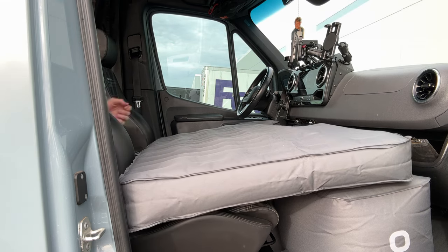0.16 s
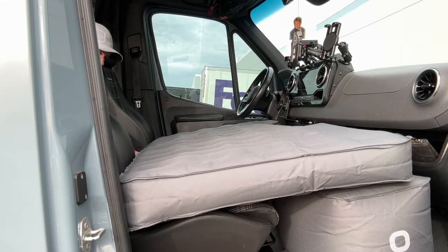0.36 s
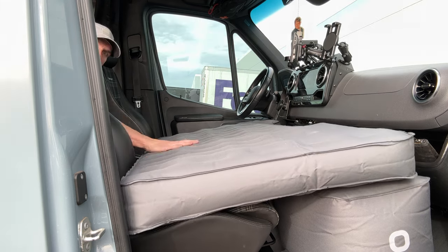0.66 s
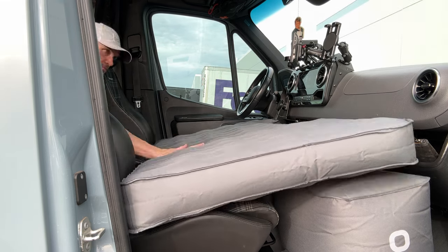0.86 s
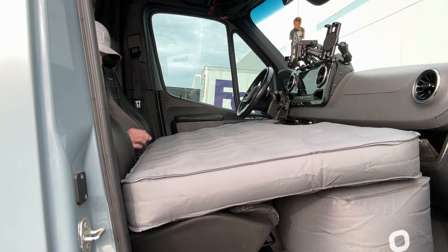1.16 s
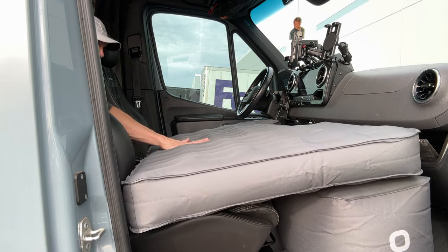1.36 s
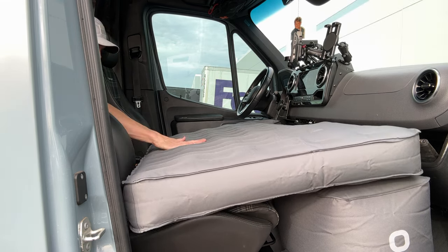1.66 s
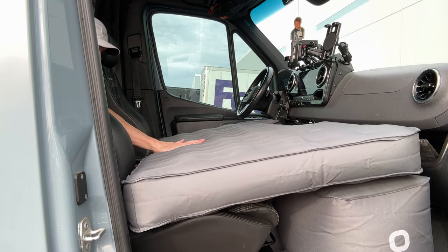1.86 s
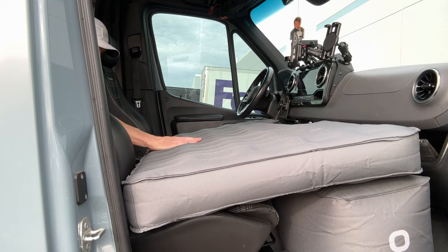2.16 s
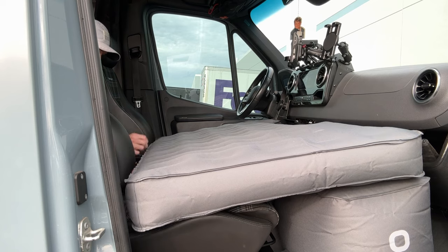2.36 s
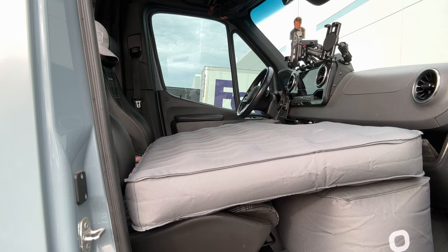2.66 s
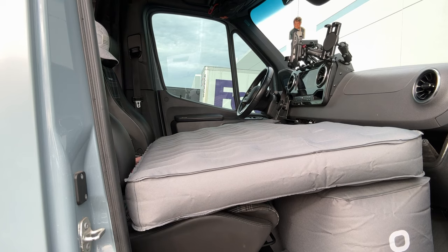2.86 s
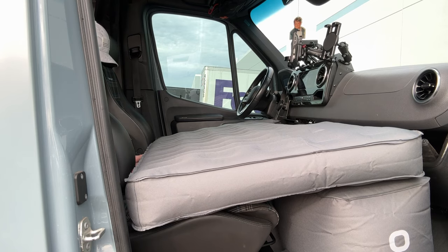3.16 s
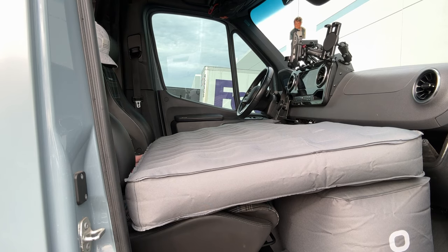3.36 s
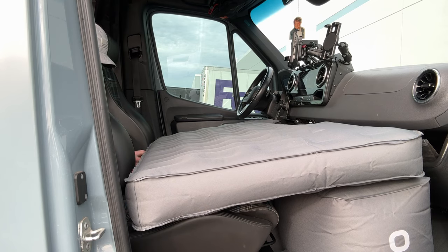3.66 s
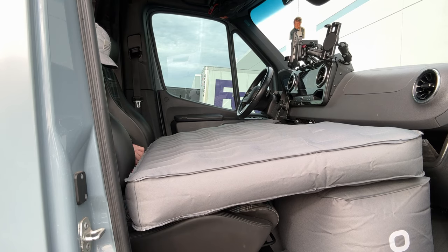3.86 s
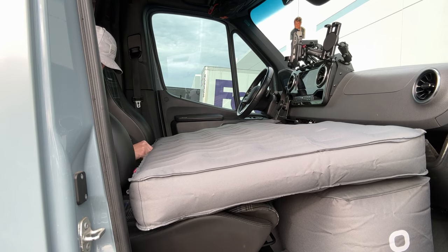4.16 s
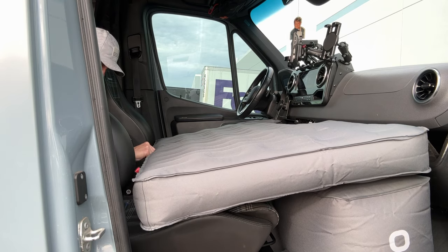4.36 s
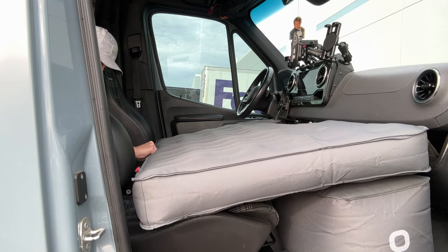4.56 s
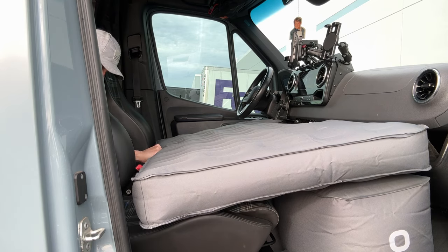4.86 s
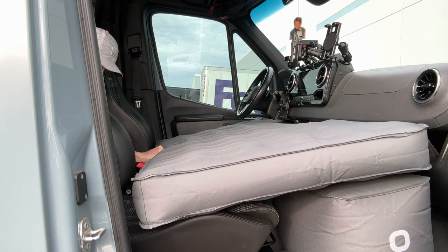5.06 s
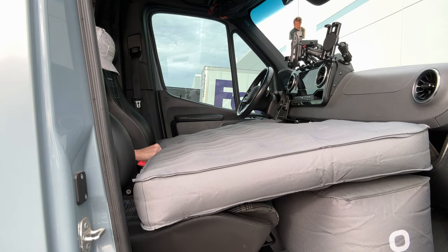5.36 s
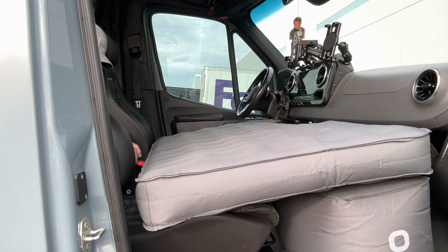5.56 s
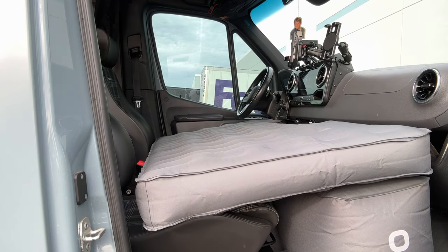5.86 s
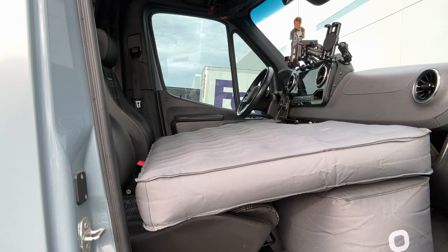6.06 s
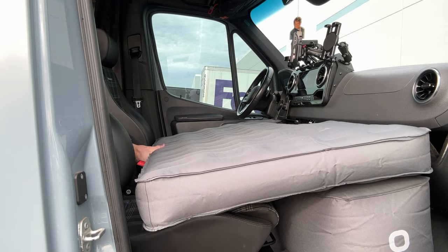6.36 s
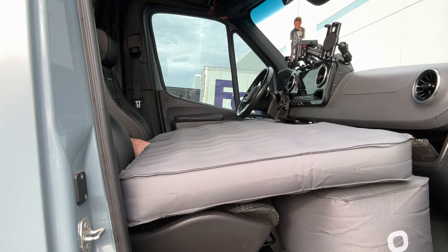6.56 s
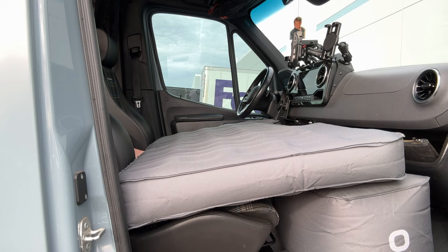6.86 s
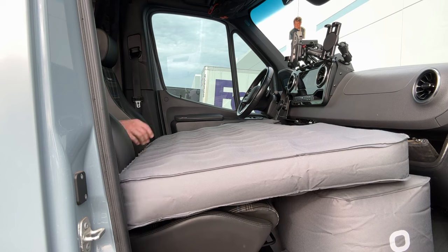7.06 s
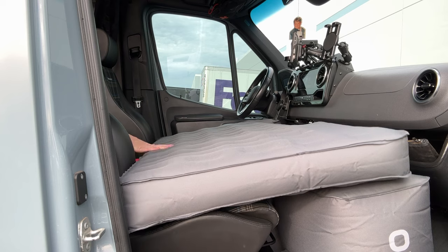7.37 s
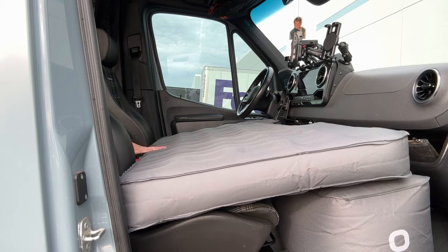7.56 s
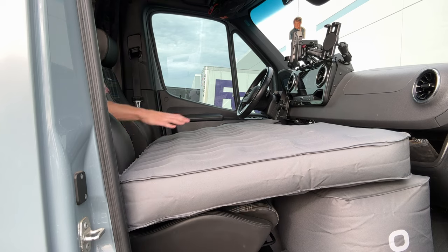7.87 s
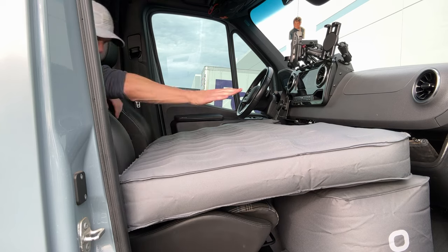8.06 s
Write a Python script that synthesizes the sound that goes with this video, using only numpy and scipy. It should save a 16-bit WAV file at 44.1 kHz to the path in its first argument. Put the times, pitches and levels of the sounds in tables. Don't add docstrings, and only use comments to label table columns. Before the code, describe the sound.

In a van cab, a small electric blower fills an air mattress. Thin hiss, faint wavering leak whistles and high whine come first, then an abrupt change to a much louder, fuller roar. The nozzle slips with a sharp air burst and thump, and the whine sags slightly. After switch-off the rotor glides down in pitch while a hand pats and rubs the vinyl. One close microphone, right channel only, left silent.

```python
import sys
import numpy as np
from scipy import signal
from scipy.fft import rfft, irfft, next_fast_len
from scipy.io import wavfile
from scipy.ndimage import uniform_filter1d

SR = 44100
rng = np.random.default_rng(int(sys.argv[2]) if len(sys.argv) > 2 else 0)


def gain_from_db(level_db):
    decades = np.asarray(level_db, float) / 20
    return 10 ** decades


def transcribe(u):
    v = np.clip(np.atleast_2d(u).T, -1, 1)
    q = np.round(v * 32767).astype(np.int16)
    wavfile.write(sys.argv[1], SR, q)


N = 362502
SLOW = 32
MOVE_S, SLIP_S, SWITCH_OFF_S = 1.625, 3.42, 5.75


def rms_one(x):
    return x / np.sqrt(np.mean(x ** 2) + 1e-20)


def at_hz(points, hz):
    point_hz, point_db = np.transpose(points)
    return np.interp(np.log(hz), np.log(point_hz), point_db)


def drift(rate_hz):
    r = np.exp(-2 * np.pi * rate_hz * SLOW / SR)
    noise = rng.standard_normal(N // SLOW + 3001)
    return rms_one(signal.lfilter([1], [1, -2 * r, r * r], noise)[3000:])


def full_rate(slow):
    return np.interp(np.arange(N) / SLOW, np.arange(len(slow)), slow)


def ring(clicks, hz, t60):
    r, w = gain_from_db(-60 / (t60 * SR)), 2 * np.pi * hz / SR
    return signal.lfilter([0, np.sin(w)], [1, -2 * r * np.cos(w), r * r], clicks + 1e-18)


def band_noise(order, low_hz, high_hz, n):
    band = signal.butter(order, [low_hz, high_hz], "band", fs=SR, output="sos")
    return signal.sosfilt(band, rng.standard_normal(n))


def bell(t, s, half):
    return np.exp(-((t - s) / half) ** 2)


def by_side(t, nozzle_db, pump_db, slipped_db):
    slip = np.clip((t - SLIP_S) / 0.18, 0, 1)
    return np.where(t < MOVE_S, nozzle_db, pump_db + (slipped_db - pump_db) * slip)


def rotor(t):
    # time in seconds, blade pass rate in Hz
    speed = [(0, 2676), (.5, 2675), (1.02, 2664), (1.53, 2648), (2.04, 2642), (2.55, 2637), (3.42, 2635),
             (3.5, 2615), (3.63, 2578), (3.8, 2543), (4.0, 2526), (4.59, 2518), (5.1, 2512), (5.6, 2528),
             (5.761, 2525)]
    drag_equals_friction_hz, coast_rate_per_s = 1080.3, .29484
    off_s, off_hz = speed[-1]
    angle = np.arctan(off_hz / drag_equals_friction_hz) - coast_rate_per_s * np.maximum(t - off_s, 0)
    free_hz = drag_equals_friction_hz * np.tan(angle)
    blade_hz = np.where(t < off_s, np.interp(t, *np.transpose(speed)), free_hz)
    return blade_hz, 20 * np.log10(free_hz / off_hz)


def blade_levels():
    # level in dB from the nozzle side, from the pump side,
    # after the nozzle slips, change in dB when coasting
    blades = [(-67.5, -51, -43.5, -3), (-63, -62.5, -55, 2.5), (-67, -55, -52, -2.5),
              (-62.5, -58.5, -59.5, 1), (-80, -58.5, -58, -5), (-99.5, -90, -73, 6)]
    # time in seconds, half length in seconds, change in dB
    hand_turns = [
        [(.4, 0.076, 7.5), (.8, 0.28, -2), (3.412, 0.01, -12)],
        [(1.86, 0.1, -5.5), (2.5, 0.046, -7), (3.15, 0.29, 8.5), (4.88, 0.12, -16), (5.14, 0.15, 2),
         (5.5, 0.28, -5)],
        [(2.0, 0.3, 9), (3.65, 0.22, 8.5), (4.8, 0.093, -8), (5.6, 0.11, 6.5)],
        [(2.98, 0.2, -16), (3.6, .08, 10.5), (3.91, 0.16, -12), (4.87, 0.11, -2), (5.5, 0.094, -20)],
        [(1.45, .2, 6), (1.9, 0.15, -12), (2.55, 0.27, 5.5), (3.62, 0.16, 4), (4.12, 0.087, -1),
         (4.58, 0.091, 5), (5.3, 0.12, -13), (5.54, 0.078, 6.5)],
        [(3.8, .12, -3), (4.98, 0.14, 10), (5.38, .07, 5)],
        [],
    ]
    # frequency in Hz, gain in dB
    housing = [(700, 14.5), (1000, 5), (1700, -10), (2620, -5), (2900, 2.5), (4300, 6), (5900, -3),
               (16000, 12)]
    echo_share, echo_comb_hz = 0.42, 433
    t = np.arange(0, N, SLOW) / SR
    blade_hz, slower_db = rotor(t)
    coast = np.clip((t - SWITCH_OFF_S) / 0.15, 0, 1)
    levels = []
    for k, (nozzle_db, pump_db, slipped_db, coast_db) in enumerate(blades):
        line_hz = (k + 1) * blade_hz
        turned_db = sum(db * bell(t, s, half) for s, half, db in hand_turns[0] + hand_turns[k + 1])
        echo_db = 20 * np.log10(abs(1 - echo_share * np.exp(2j * np.pi * line_hz / echo_comb_hz)))
        speed_db = (2.72 + 0.46 * k) * slower_db
        free_db = speed_db + coast * (coast_db + at_hz(housing, line_hz) + echo_db)
        levels.append(full_rate(by_side(t, nozzle_db, pump_db, slipped_db) + turned_db + free_db))
    return full_rate(blade_hz), levels


def impeller(flutter_db, coast_flutter_db, wobble):
    blade_hz, levels_db = blade_levels()
    turns = np.cumsum(blade_hz * (1 + wobble * full_rate(drift(25)))) / SR / 8
    whine, t = np.zeros(N), np.arange(N) / SR
    depth_db = np.where(t < SWITCH_OFF_S, flutter_db, coast_flutter_db)
    for k, level_db in enumerate(levels_db):
        flutter = depth_db * full_rate(0.22 * drift(11.6) + 0.73 * drift(40))
        tone = np.sin(2 * np.pi * 8 * (k + 1) * turns + k)
        whine += gain_from_db(level_db + 3.0 + flutter) * tone
    whine *= np.clip((8.0 - t) / 0.036, 0, 1)
    return whine + shaft(turns, blade_hz), turns


def shaft(turns, blade_hz):
    # multiple of the shaft rate, level in dB before and in dB after the nozzle slips
    orders = [(1, -60.5, -56), (2, -55, -64.5), (3, -68, -54), (4, -56, -52), (5, -65, -57), (9, -56, -85),
              (12, -63.5, -82), (13, -61, -55), (14, -56, -66), (18, -59.5, -68)]
    out, t = np.zeros(N), np.arange(N) / SR
    for order, early_db, late_db in orders:
        level_db = np.where(t < SLIP_S, early_db, late_db)
        out += gain_from_db(level_db + 2.28 * full_rate(drift(4.2))) * np.sin(2 * np.pi * round(order) * turns)
    return out * (t > MOVE_S) * (blade_hz / 2550) ** 4.3


def zone_levels(t):
    # level in dB from the nozzle side, pump side, slipped,
    # share of the flow's swing, power of speed when coasting
    zones = [
        (-89.5, -67.5, -68.5, .1, 0.061),
        (-68.5, -44, -45, 0.16, 1.61),
        (-53.5, -44.5, -48, 1.0, 2.85),
        (-50, -50.5, -50.5, 0.85, 3.87),
    ]
    # time in seconds, level in dB
    flow = [(1.64, -47.5), (1.68, -50), (1.81, -47.5), (2.2, -48), (2.74, -46), (3.72, -46), (4.31, -44),
            (5.59, -44.5), (5.74, -45.5)]
    # time in seconds, half length in seconds, low level in dB, high level in dB
    rubs = [
        (5.52, 0.069, -55.5, -80),
        (6.655, .13, -60, -70.5),
        (7.083, 0.046, -89, -89),
        (7.303, 0.064, -50, -91),
        (7.54, 0.29, -67, -73),
        (8.211, 0.056, -64, -84),
    ]
    roar_spill_db, rush_spill_db, cab_hiss_db = -3.0, 2.5, -85.5
    flow_s, flow_levels_db = np.transpose(flow)
    flow_db = np.interp(t, flow_s, flow_levels_db) - np.mean(flow_levels_db)
    flow_db = flow_db * (t > MOVE_S) * (t < SWITCH_OFF_S)
    low = sum(gain_from_db(low_db) * bell(t, s, half) for s, half, low_db, high_db in rubs)
    high = sum(gain_from_db(high_db) * bell(t, s, half) for s, half, low_db, high_db in rubs) + gain_from_db(cab_hiss_db)
    roar = gain_from_db(roar_spill_db) * low * (t > SWITCH_OFF_S)
    rubbed = [low, roar, gain_from_db(rush_spill_db) * high, high]
    slower_db, gains = rotor(t)[1], []
    for (nozzle_db, pump_db, slipped_db, flow_share, speed_power), rub in zip(zones, rubbed):
        air_db = by_side(t, nozzle_db, pump_db, slipped_db) + flow_share * flow_db + speed_power * slower_db
        gains.append(np.hypot(gain_from_db(air_db), rub))
    return gains


def air(turns, patchy_db, throb):
    zone_tops_hz = [170, 1900, 5200]
    # frequency in Hz, level in dB per Hz
    nozzle_side = [(18, -79), (30, -33), (248, -27), (289, -16), (322, -21), (485, -25), (1100, -29),
                   (1490, -25.5), (1660, -19), (2610, -5), (3310, -8.5), (5200, 1.5), (6760, -31),
                   (11400, -120)], [(3060, -32), (5200, -2), (5500, 0), (6090, -6), (7490, -8.5),
                   (9570, -2.5), (11000, -10), (12800, -13), (14400, -9), (15700, -19)]
    pump_side = [(18, -48), (30, -9), (142, -23), (315, -6.5), (454, -8), (700, 0), (779, -8), (1200, -1),
                 (1400, -10.5), (1600, -25.5), (1850, -20), (2440, -23.5), (2610, -19), (2780, -12),
                 (3530, -10), (4570, -11.5), (5200, -28), (6760, -51), (11400, -120)], [(3060, -29),
                 (5200, 1), (5550, 0), (5760, 5), (7670, 0.5), (8850, -8.5), (10200, 4.5), (11800, -11.5),
                 (13400, 17), (15700, -27)]
    slipped_side = [(18, -48), (30, -14), (161, -21), (302, -9.5), (366, -9.5), (628, -1), (831, -5.5),
                    (1230, -2), (2060, -19.5), (2290, -12), (2440, -31.5), (2660, -8.5), (3930, -5),
                    (5200, -17), (6760, -44), (11400, -120)], [(3060, -31), (5200, -1), (5420, -5.5),
                    (6930, 0.5), (7390, -1), (9010, -7.5), (10000, -4), (11300, -3), (15100, -6.5),
                    (15700, -8)]
    # frequency in Hz, level in dB per Hz
    coasting_air = [(18, -28), (30, 1), (66, 2), (137, -14), (566, -5.5), (698, 1.5), (838, -2),
                    (1840, -18), (2460, -23.5), (4150, -18.5), (5830, -26.5), (7990, -29), (15800, -33.5)]
    size = next_fast_len(N)
    white = rfft(rng.standard_normal(size))
    log_hz = np.log(np.fft.rfftfreq(size, 1 / SR) + 0.0014)
    centres = np.r_[25 * 2 ** np.arange(0, 3, .5), 200 * 2 ** np.arange(0, 6.4, 1 / 6)]
    t = np.arange(0, N, SLOW) / SR
    colours_db = []
    for body, hiss in (nozzle_side, pump_side, slipped_side, (coasting_air, coasting_air)):
        colour_db = np.where(centres < zone_tops_hz[-1], at_hz(body, centres), at_hz(hiss, centres))
        colours_db.append(colour_db[:, None])
    nozzle, pump, slipped, coasting = colours_db
    slip = np.clip((t - SLIP_S) / 0.25, 0, 1)
    coast = np.clip(t - SWITCH_OFF_S, 0, 1)
    moving = pump + slip * (slipped - pump) + coast * (coasting - slipped)
    colour = gain_from_db(np.where(t < MOVE_S, nozzle, moving))
    zones, zone_gain, gust = np.searchsorted(zone_tops_hz, centres), zone_levels(t), drift(5)
    share = np.gradient(centres) / (SR / 2)
    out = np.zeros(N)
    for k in range(len(centres)):
        same = zones == zones[k]
        level = zone_gain[zones[k]] / np.sqrt(share[same] @ colour[same] ** 2)
        patches = gain_from_db(patchy_db * (gust + 1.26 * drift(7.8) + 1.72 * drift(0.69)))[:len(t)]
        part = np.interp(log_hz, np.log(centres), np.eye(len(centres))[k], left=0)
        out += full_rate(level * colour[k] * patches) * irfft(white * part, size)[:N]
    return out * (1 + throb * np.sin(2 * np.pi * turns))


def leak():
    # time in seconds, frequency in Hz, level in dB
    whistles = [
        [(0.02, 1457, -64), (0.092, 1383, -70.5), (0.432, 1284, -75), (0.494, 1325, -82), (0.514, 1241, -75),
         (0.578, 1306, -77), (0.608, 1500, -74), (0.706, 1217, -78), (0.74, 1238, -74)],
        [(0.82, 1101, -81), (0.882, 1249, -74), (0.922, 1188, -75), (0.96, 1408, -78)],
        [(1.02, 1486, -75), (1.104, 1550, -71), (1.186, 1374, -71), (1.208, 1461, -76), (1.366, 1556, -71),
         (1.478, 1770, -78), (1.5, 1706, -73)],
    ]
    gate, t = np.zeros(N), np.arange(N) / SR
    for rows in whistles:
        gate += np.clip(np.minimum(t - rows[0][0], rows[-1][0] - t) / 0.0054, 0, 1)
    row_s, row_hz, row_db = np.transpose(np.concatenate(whistles))
    hz, level_db = np.interp(t, row_s, row_hz), np.interp(t, row_s, row_db)
    phase = 2 * np.pi * np.cumsum(hz * (1 + 0.0038 * full_rate(drift(40)))) / SR
    return gate * gain_from_db(level_db + 6.5 + 2.2 * full_rate(drift(25))) * np.sin(phase)


def hums():
    # start in seconds, end in seconds, frequency in Hz, t60 in seconds, level in dB
    tones = [
        (0, 1.65, 826, 0.4, -81),
        (0, 1.65, 325, .08, -80),
        (4.95, 5.95, 1250, .012, -53),
        (1.6, 4.2, 716, 0.045, -54.5),
        (3.5, 5.7, 625, 0.05, -52.5),
        (6.6, 7.2, 736.5, 0.064, -62.5),
        (7.53, 7.84, 3330, .02, -73),
    ]
    out, t = np.zeros(N), np.arange(N) / SR
    for start, end, hz, t60, db in tones:
        rough = ring(ring(rng.standard_normal(N), hz, t60), hz, t60)
        out += gain_from_db(db) * rms_one(rough) * np.clip(np.minimum(t - start, end - t) / 0.13, 0, 1)
    return out


def puffs():
    # start in seconds, length in seconds, centre in Hz, level in dB
    bursts = [
        (0, 0.018, 840, -46),
        (0, 0.021, 2920, -45),
        (0.033, 0.07, 800, -67),
        (2.223, 0.11, 2200, -51),
        (3.401, 0.056, 3920, -35.5),
        (3.434, 0.098, 3640, -39.5),
        (6.901, 0.13, 10200, -62.5),
        (6.614, 0.067, 950, -55),
    ]
    out = np.zeros(N)
    for s, length, hz, db in bursts:
        i, n = round(s * SR), round(length * SR)
        noise = band_noise(2, hz / 1.46, hz * 1.385, SR // 4)
        ragged_db = 2.5 * rms_one(uniform_filter1d(rng.standard_normal(SR // 4), size=250))
        noise = rms_one(noise * gain_from_db(ragged_db))
        out[i:i + n] += gain_from_db(db) * noise[-n:] * np.sin(np.pi * np.linspace(0, 1, n) ** 0.63)
    return out


def pats():
    # time in seconds, peak in dB, body in
    # Hz, body t60 in seconds, slap in dB
    thuds = [
        (3.447, -31.5, 226, 0.068, -70),
        (4.172, -31, 169, 0.03, -75),
        (5.419, -38.5, 317, 0.085, -75),
        (5.518, -38, 192, 0.091, -75),
        (6.52, -44, 237, 0.086, -85),
        (6.996, -47, 248, 0.15, -71),
        (8.056, -44.5, 165, 0.051, -60),
        (8.137, -47, 225, 0.073, -77),
             (0.511, -56, 910, 0.08, -44.5), (0.661, -59, 291, 0.064, -48), (1.22, -55, 250, 0.096, -47),
               (5.729, -71, 1180, 0.07, -29), (6.629, -40, 846, 0.21, -60), (6.706, -28.5, 643, 0.12, -56),
               (7.042, -46, 694, 0.039, -60), (7.185, -40, 700, 0.1, -53), (7.252, -15, 273, 0.055, -31),
               (7.779, -49, 660, 0.07, -73), (7.956, -44.5, 305, 0.13, -74),
               (7.99, -38.5, 466, 0.12, -77.5), (8.106, -50.5, 385, 0.07, -60),
               (8.208, -48, 605, 0.11, -52)]
    # frequency in Hz, level in dB, t60 in seconds
    mattress = [(123, -12, 0.14), (175, -13.5, 0.27), (260, -6, 0.14), (364, -2.5, 0.08), (460, 6.5, 0.042),
                (705, 7, 0.03), (975, 7.5, 0.034), (1365, 0, 0.058), (1780, -10, 0.15), (2900, -15, 0.17)]
    out, n = np.zeros(N + SR), SR // 4
    t = np.arange(n) / SR
    no_deep_bass = signal.butter(2, 130, "high", fs=SR, output="sos")
    for s, peak_db, body_hz, t60, slap_db in thuds:
        push = np.zeros(n)
        push[0], push[90] = -.6, 1
        push += 0.082 * rng.standard_normal(n) * gain_from_db(-60 * t / (.5 * t60))
        thud = 0.72 * ring(push, body_hz, 0.93 * t60)
        for hz, db, decay in mattress:
            far_db = -3.6 * abs(np.log2(hz / body_hz))
            thud += gain_from_db(db + far_db + rng.normal(0, 2.4)) * ring(push, hz, decay * t60 / 0.091)
        thud = signal.sosfilt(no_deep_bass, thud)
        slap = band_noise(1, 900, 5000, n) * (gain_from_db(-60 * t / 0.085) + 0.052 * gain_from_db(-60 * t / 0.6))
        i = round(s * SR)
        out[i:i + n] += gain_from_db(peak_db) * thud / abs(thud).max() + gain_from_db(slap_db) * slap
    return out[:N]


def squeaks():
    # start in seconds, length in seconds, start in Hz, end in Hz, level in dB
    chirps = [
        (7.602, 0.035, 10400, 10290, -53),
        (8.004, 0.093, 7800, 7900, -59),
        (8.045, 0.033, 6900, 6850, -59),
        (8.205, 0.026, 2860, 2830, -50.5),
    ]
    out = np.zeros(N + SR)
    for s, length, start_hz, end_hz, db in chirps:
        i, u = round(s * SR), np.linspace(0, 1, round(length * SR))
        waver_hz = 150 * np.sqrt(130) * uniform_filter1d(rng.standard_normal(len(u)), size=130)
        hz = start_hz + (end_hz - start_hz) * u + waver_hz
        swell = 2.5 * np.sqrt(u) * (1 - u) ** 2
        out[i:i + len(u)] += gain_from_db(db) * swell * np.sin(2 * np.pi * np.cumsum(hz) / SR)
    return out[:N]


def scene():
    whine, turns = impeller(flutter_db=3.2, coast_flutter_db=3.8, wobble=.0005)
    roar = air(turns, patchy_db=0.9939, throb=0.026)
    sound = whine + roar + leak() + hums() + puffs() + pats() + squeaks()
    mic_gain_db = 6.0
    return np.array([np.zeros(N), gain_from_db(mic_gain_db) * sound])


def low_pass(x):
    return signal.sosfilt(signal.butter(12, 16810, fs=SR, output="sos"), x)


def record(dry):
    top_cut = signal.ellip(12, .5, 45, 15730, fs=SR, output="sos")
    return low_pass(signal.sosfilt(top_cut, dry))


dry = scene()
out = record(dry)
transcribe(out)
```